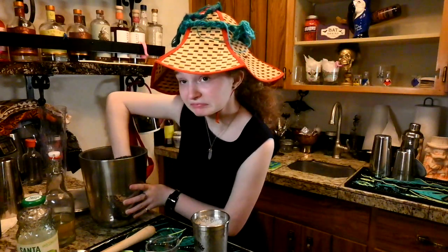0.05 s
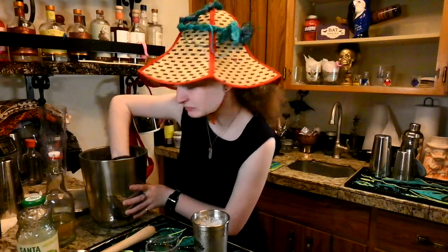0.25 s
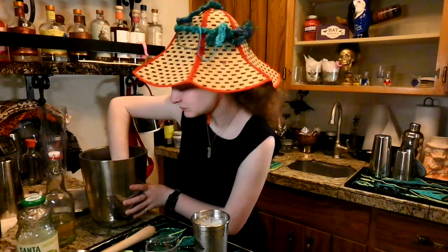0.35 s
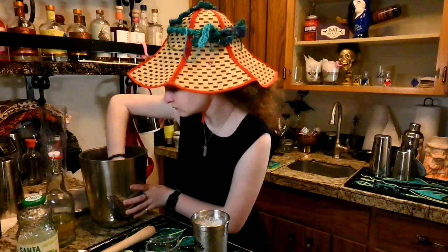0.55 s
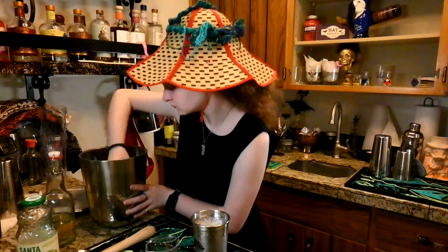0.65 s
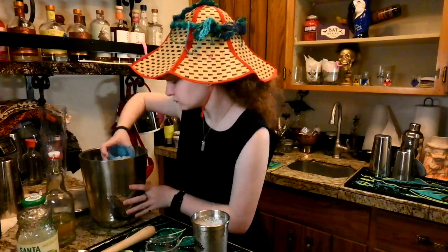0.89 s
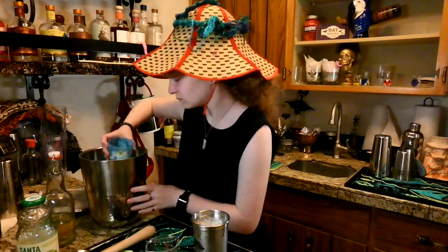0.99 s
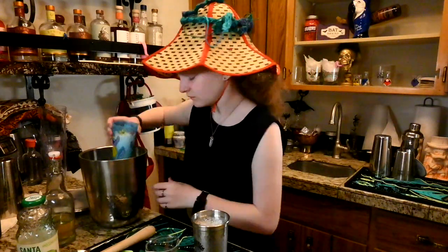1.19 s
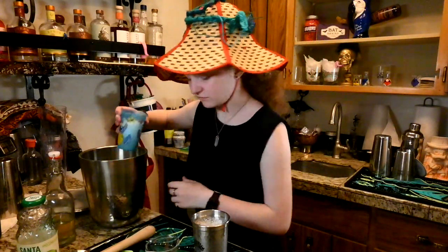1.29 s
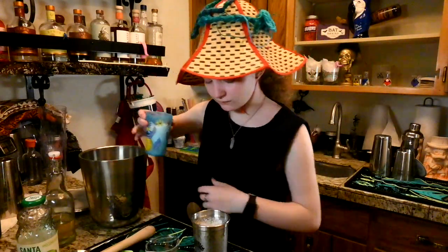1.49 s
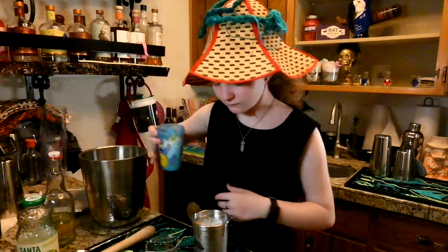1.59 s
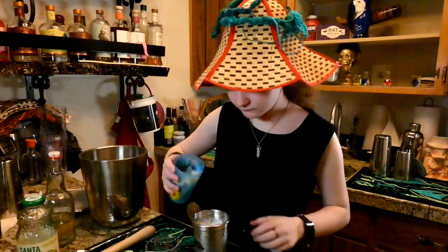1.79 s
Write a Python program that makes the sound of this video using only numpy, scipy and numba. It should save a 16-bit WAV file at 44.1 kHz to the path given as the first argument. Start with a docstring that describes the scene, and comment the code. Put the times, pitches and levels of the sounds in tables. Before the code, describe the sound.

A plastic cup digs through crushed ice in a steel bucket. A small light crunch comes at 0.07 s, then dense crunching from 0.2 to 0.65 s, with bright cracks and a strong hollow, low thump at 0.3. A gritty squeak rubs around 0.7-0.8, sharp hollow knocks follow near 0.88, loose ice hisses and ticks until 1.1. Then faint air and hum, close, with short kitchen reflections.

```python
"""Cup digging in an ice bucket

A plastic cup digs through crushed ice in a steel bucket: dense random grains crunch through the bucket's
resonances, sine bursts splinter, filtered clicks crack, and lumps that give way thump the bucket.
The cup squeaks up the wall as resonated grit and is knocked clear as hollow clicks; loose ice hisses and
settles in it, and a last chip drops. Small kitchen reflections, filtered-noise air, faint mains hum.
"""
import sys
import numpy as np
from scipy import signal
from scipy.fft import rfft, irfft, next_fast_len
from scipy.io import wavfile
from scipy.ndimage import uniform_filter1d
from numba import njit

SR = 44100
rng = np.random.default_rng(int(sys.argv[2]) if len(sys.argv) > 2 else 0)


def wav_out(sig):
    """Save sig, one row per channel (or a flat mono array), as 16-bit PCM at SR to the path in sys.argv[1]."""
    wavfile.write(sys.argv[1], SR, np.round(np.clip(np.atleast_2d(sig).T, -1, 1) * 32767).astype(np.int16))


N = 81585

# force of the cup on the ice (time [s], crunch level [dB])
DIG_FORCE = [(0, -53), (.05, -54), (.078, -36), (.11, -99), (.205, -58), (.236, -23.5), (.265, -32),
             (.305, -29), (.355, -24.5), (.405, -32), (.438, -34.5), (.474, -19.5), (.499, -41.5),
             (.535, -27.5), (.578, -35.5), (.6, -30), (.622, -37), (.636, -31), (.665, -48), (.78, -65),
             (.87, -47.5)]
# cup rubbing, going in and coming out (time [s], level [dB], pitch [Hz])
RUB_PATH = [(.065, -73, 1100), (0.082, -37, 1006), (.11, -61, 1010), (.2, -67, 1200), (.68, -48, 2850),
            (0.716, -42, 2580), (.755, -41, 2560), (.785, -74, 2490), (0.801, -42, 2430), (.87, -58, 2150)]
# loose ice moving in the cup (time [s], level [dB])
SLIDE_LEVEL = [(.66, -57), (.72, -42), (.78, -46.5), (.83, -48.5), (.865, -46), (.9, -41), (.945, -42),
               (.965, -33), (1.01, -32), (1.035, -46), (1.12, -69.5)]
# lumps that give way and thump the bucket (time [s], level [dB], pitch [Hz])
THUMP_EVENTS = [(.062, -45, 394), (.075, -42.5, 416), (.2212, -31, 564), (.233, -28, 427),
                (.3077, -15.5, 411), (.32, -28.5, 510), (.33, -26.5, 410), (.383, -27.5, 429),
                (.437, -32.5, 488), (.449, -32, 495), (.468, -34, 494), (.477, -28, 520), (.558, -38, 420),
                (.606, -35.5, 440), (.775, -48, 443)]
# pieces of ice that snap or drop (time [s], level [dB], pitch [Hz])
CRACK_EVENTS = [(.028, -56, 6300), (.053, -51, 4350), (.0755, -51, 9300), (.2185, -48.5, 5000),
                (.232, -25.5, 8200), (0.2766, -25.5, 6340), (0.35, -37, 3900), (.488, -34.5, 4200),
                (0.585, -35.5, 6700), (0.631, -36, 4000), (0.797, -51, 5430), (0.8437, -41.5, 8800),
                (.9085, -45, 7350), (0.964, -49, 8500), (0.9867, -33, 6800), (1.008, -34.5, 9000),
                (1.094, -38.5, 7270), (1.347, -62, 3870)]
# knocks on the hollow cup, soft ones mostly ring, hard ones mostly click
# (time [s], level [dB], pitch [Hz], ring over click [dB])
KNOCK_EVENTS = [(0.0695, -41.5, 1630, 20), (0.3077, -23.5, 1390, 20.5), (.531, -32, 2710, 15),
                (.596, -31, 1725, 23.5), (0.754, -39, 1630, 18), (.8749, -23.5, 1650, 10),
                (.886, -30, 1840, 16), (.893, -31.5, 2014, 24), (0.9532, -32.5, 4100, 19),
                (.979, -32, 1636, 21), (1.092, -55, 2830, 16)]
# resonances of the ice-filled bucket (frequency [Hz], width [Hz], lift [dB])
BUCKET_MODES = [(368.4, 14, 8.5), (418.3, 13.6, 14.5), (514.8, 13.3, 11.5), (547.7, 13.9, 17),
                (677, 45, 2.5), (1080, 170, 5.5), (1590, 200, 9), (2733, 190, 10.5), (4200, 220, 12)]
# resonances of the cup with ice in it (frequency [Hz], width [Hz], lift [dB])
CUP_MODES = [(680, 56, 15), (1220, 144, 12.5), (1660, 190, 2), (1953, 73, 5), (2880, 130, 6.5),
             (4100, 220, 10)]
# crunch spectrum, relative (frequency [Hz], density [dB per Hz])
CRUNCH_SPECTRUM = [(130, -20.5), (230, -9.5), (340, -5), (520, -1), (750, -2), (2100, -7.5), (7500, -5.5),
                   (10000, -9), (16000, -31.5)]
# sliding-chip spectrum, relative (frequency [Hz], density [dB per Hz])
CHIP_SPECTRUM = [(200, -35), (400, -3.5), (900, -12.5), (1800, 0), (6000, -7), (9500, -9), (12000, -18),
                 (16000, -33)]
# spectrum of cracks and rubbing hiss, relative (frequency [Hz], density [dB per Hz])
SNAP_SPECTRUM = [(150, -32), (1000, -13), (3000, 0), (6000, -0.5), (9000, -3.5), (12000, -10), (16000, -48)]
# hollow-knock spectrum, relative (frequency [Hz], density [dB per Hz])
HOLLOW_SPECTRUM = [(150, -36.5), (450, -6.5), (950, -27), (1600, 3), (3500, -2), (5000, -6.5),
                   (7500, -10.5), (10000, -27), (16000, -36)]
# room-air spectrum, relative (frequency [Hz], density [dB per Hz])
AIR_SPECTRUM = [(25, -21.5), (55, -12.5), (130, -7.5), (320, -4.5), (1000, -9.5), (4000, -12),
                (15000, -21.5)]
# mains hum before the low cut (frequency [Hz], level [dB])
HUM_TONES = [(60, -74.5), (180, -75.5)]
# kitchen reflections (band from [Hz], band to [Hz], t60 [s], level before band-pass [dB])
ROOM_BANDS = [(100, 890, 0.23, -6), (1210, 5100, 0.25, -7), (5000, 11000, 0.26, -7)]

AIR_DB = -64.5  # before the low cut
CRUNCH_PER_S, SLIDE_PER_S, RUB_PER_S = 2900, 2800, 3900
CRUNCH_SPREAD_DB, SLIDE_SPREAD_DB, RUB_SPREAD_DB = 2.5, 3.5, 0.5
BLOW_S = .01  # reference duration for blow levels
SPLINTER_LOW_HZ, SPLINTER_HIGH_HZ, SPLINTER_CYCLES, SPLINTER_DB = 1500, 8500, 2, -12
CONTACT_S, CONTACT_SPREAD_DB, CONTACT_DETUNE_PER_KHZ = .03, 4, .008
CRACK_WIDTH_HZ, CRACK_LIFT_DB, CRACK_CRUMBLE_S, CRACK_CRUMBLE_DB = 900, 11, .006, 7
THUMP_PASS_WIDTH_HZ, THUMP_RING_DB = 339, -8.5
RUB_PASS_WIDTH_HZ, RUB_HISS_DB = 350, -8
KNOCK_WIDTH_HZ, KNOCK_CRUMBLE_S, KNOCK_CRUMBLE_DB = 76, 0.011, 5
ROOM_GAP_S = 0.006
LOW_CUT_HZ, TOP_HZ = 72, 15850


def undb(db):
    """Decibels to gain."""
    return 10 ** (np.asarray(db) / 20)


def curve(points):
    """Gain over time from (time [s], level [dB]), silent outside the points."""
    s, db = np.array(points).T
    return undb(np.interp(np.arange(N) / SR, s, db, left=-200, right=-200))


def body(x, spectrum, resonances=()):
    """Ring x through a causal, unit-energy filter: broad spectrum plus resonances."""
    size = 2 * next_fast_len(N)
    f = np.arange(size // 2 + 1) * SR / size
    hz, spectrum_db = np.array(spectrum).T
    db = np.interp(np.log(f + 1), np.log(hz), spectrum_db)
    for centre_hz, width_hz, lift_db in resonances:
        offset = (f - centre_hz) / width_hz * 2
        db = db + 10 * np.log10(1 + (undb(lift_db) ** 2 - 1) / (1 + offset ** 2))
    # folded cepstrum gives minimum phase
    cepstrum = irfft(np.log(undb(db)))
    response = np.exp(rfft(2 * cepstrum[:size // 2], size))
    rms_gain = np.sqrt(np.mean(abs(response) ** 2))
    return irfft(rfft(x, size) * response / rms_gain)[:N]


@njit
def resonate(x, hz, width):
    """State-variable band-pass with a moving centre and unit gain there."""
    y, band, low = np.empty(len(x)), 0., 0.
    for i in range(len(x)):
        g, k = np.tan(np.pi * hz[i] / SR), width / hz[i]
        v = (band + g * (x[i] + 1e-18 - low)) / (1 + g * (g + k))
        band, low, y[i] = 2 * v - band, low + 2 * g * v, k * v
    return y


def level_out(x, window):
    """Divide x by its running RMS over window samples."""
    return x / np.sqrt(np.abs(uniform_filter1d(x ** 2, size=window)) + 1e-9)


def grains(per_s, spread_db):
    """Random tiny fractures of uneven size, at an even overall power."""
    hits = rng.random(N) < per_s / SR
    signs = rng.choice([-1, 1], N)
    sizes = undb(spread_db * np.minimum(rng.standard_normal(N), 1))
    return level_out(hits * signs * sizes, 500)


def place(x, s, db):
    """Start a blow at s; its level is its energy spread over BLOW_S."""
    delayed = np.r_[np.zeros(int(max(s, 0) * SR)), x][:N]
    return delayed * undb(db) * np.sqrt(BLOW_S * SR / np.sum(x ** 2))


def fracture(crumble_s, crumble_db):
    """One sharp click plus a decaying spray of crumbs; crumble_db is crumb over click energy."""
    crumbs = grains(CRUNCH_PER_S, RUB_SPREAD_DB) * np.exp(-np.arange(N) / SR / crumble_s)
    return signal.unit_impulse(N) + undb(crumble_db) * crumbs / np.sqrt(np.sum(crumbs ** 2))


def shifting(clicks, spectrum, resonances, count=12):
    """Contact cycles through places that ring differently; high resonances move most."""
    # random dither blends neighbouring places
    contact = (np.arange(N) / SR / CONTACT_S + rng.random(N)).astype(int) % count
    hz, width_hz, lift_db = np.array(resonances).T
    khz = hz / 1000
    out = np.zeros(N)
    for k in range(count):
        detune, swell = rng.uniform(-1, 1, (2, len(hz)))
        mode_hz = hz * (1 + CONTACT_DETUNE_PER_KHZ * khz * detune)
        mode_db = lift_db + CONTACT_SPREAD_DB * swell * np.minimum(khz, 1)
        out += body(clicks * (contact == k), spectrum, zip(mode_hz, width_hz, mode_db))
    return out


def background():
    """Room air as filtered noise; mains hum as sines of random phase."""
    t = np.arange(N) / SR
    hum = np.zeros(N)
    for hz, db in HUM_TONES:
        hum += undb(db) * np.sqrt(2) * np.sin(2 * np.pi * (hz * t + rng.random()))
    return hum + undb(AIR_DB) * body(rng.standard_normal(N), AIR_SPECTRUM)


def digging():
    """Ice crunches with the force of the cup and rings the bucket."""
    clicks = grains(CRUNCH_PER_S, CRUNCH_SPREAD_DB) * curve(DIG_FORCE)
    return shifting(clicks, CRUNCH_SPECTRUM, BUCKET_MODES)


def splinters(count=500):
    """Where ice moves, single splinters crackle, each for a few cycles at its own pitch."""
    t = np.arange(int(BLOW_S * SR)) / SR
    force = np.hypot(curve(DIG_FORCE), curve(SLIDE_LEVEL))
    out = np.zeros(N)
    for when, pitch, size in rng.random((count, 3)):
        hz = SPLINTER_LOW_HZ + pitch * (SPLINTER_HIGH_HZ - SPLINTER_LOW_HZ)
        tick = np.sin(2 * np.pi * hz * t) * t * np.exp(-hz * t / SPLINTER_CYCLES)
        gain = force[int(when * N)] * size
        out += gain * place(np.pad(tick, (0, N)), when * N / SR, SPLINTER_DB)
    return out


def cracks():
    """Bright snaps, each with the short ring of its own piece of ice."""
    out = np.zeros(N)
    for s, db, hz in CRACK_EVENTS:
        snap = fracture(CRACK_CRUMBLE_S, CRACK_CRUMBLE_DB)
        out += place(body(snap, SNAP_SPECTRUM, [(hz, CRACK_WIDTH_HZ, CRACK_LIFT_DB)]), s, db)
    return out


def thumps():
    """A dull push swells and dies within a few cycles; the bucket's modes ring on after it."""
    pushes = np.zeros(N)
    for s, db, hz in THUMP_EVENTS:
        push = signal.unit_impulse(N)
        for _ in range(4):
            push = resonate(push, np.full(N, float(hz)), float(THUMP_PASS_WIDTH_HZ))
        pushes += place(push, s, db)
    ring = np.zeros(N)
    for hz, width_hz, lift_db in BUCKET_MODES:
        ring += resonate(pushes, np.full(N, float(hz)), float(width_hz)) * undb(lift_db)
    return pushes + undb(THUMP_RING_DB) * ring


def rubbing():
    """Stick-slip of the cup: a rough squeak that glides, over a little gritty hiss."""
    s, db, hz = np.array(RUB_PATH).T
    slips = grains(RUB_PER_S, RUB_SPREAD_DB)
    pitch_hz = np.interp(np.arange(N) / SR, s, hz)
    squeak = slips
    for _ in range(2):
        squeak = resonate(squeak, pitch_hz, float(RUB_PASS_WIDTH_HZ))
    hiss = undb(RUB_HISS_DB) * body(slips, SNAP_SPECTRUM)
    return (level_out(squeak, 900) + hiss) * curve(np.c_[s, db])


def cup():
    """Crumbling clicks ring the hollow cup as knocks; sliding chips hiss through its resonances."""
    clicks = grains(SLIDE_PER_S, SLIDE_SPREAD_DB) * curve(SLIDE_LEVEL)
    out = shifting(clicks, CHIP_SPECTRUM, CUP_MODES)
    for s, db, hz, ring_db in KNOCK_EVENTS:
        blow = fracture(KNOCK_CRUMBLE_S, KNOCK_CRUMBLE_DB)
        out += place(body(blow, HOLLOW_SPECTRUM, [(hz, KNOCK_WIDTH_HZ, ring_db)]), s, db)
    return out


def kitchen(x):
    """Dense reflections from counter and cupboards: decaying noise tails in separate bands."""
    t = np.arange(N) / SR
    out = x
    for low_hz, high_hz, t60_s, db in ROOM_BANDS:
        tail = rng.standard_normal(N) * np.exp(-np.log(1000) * t / t60_s) * (t > ROOM_GAP_S)
        tail = tail / np.sqrt(np.sum(tail ** 2))
        band = signal.butter(2, [low_hz, high_hz], "band", fs=SR, output="sos")
        out = out + undb(db) * signal.fftconvolve(x, signal.sosfilt(band, tail))[:N]
    return out


def scene():
    """Ice, bucket and cup reflect in the kitchen; air and hum are added direct."""
    sources = digging() + splinters() + cracks() + thumps() + rubbing() + cup()
    return (kitchen(sources) + background())[None]


def record(dry):
    """High-pass the deepest bass, then steeply low-pass the top."""
    dry = signal.sosfilt(signal.butter(3, LOW_CUT_HZ, "high", fs=SR, output="sos"), dry)
    return signal.sosfilt(signal.ellip(10, .2, 80, TOP_HZ, fs=SR, output="sos"), dry)


dry = scene()
out = record(dry)
wav_out(out)
```